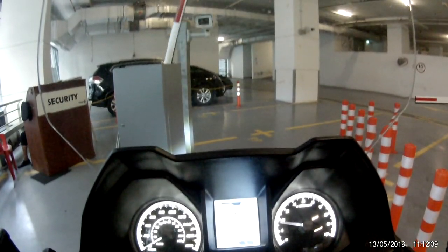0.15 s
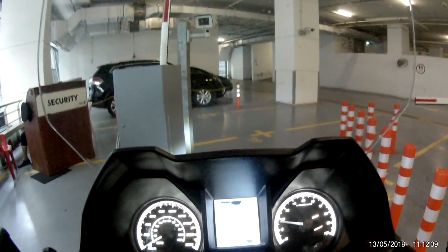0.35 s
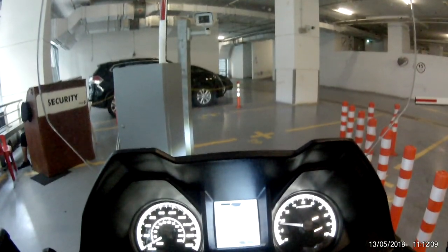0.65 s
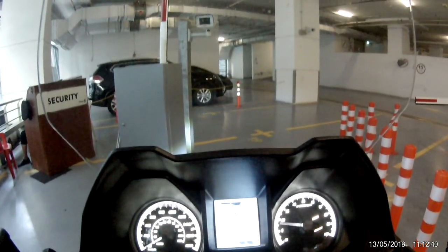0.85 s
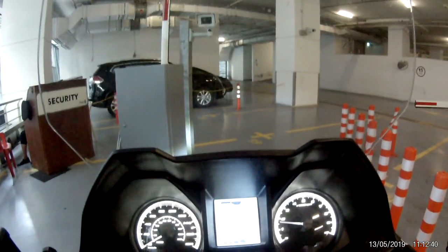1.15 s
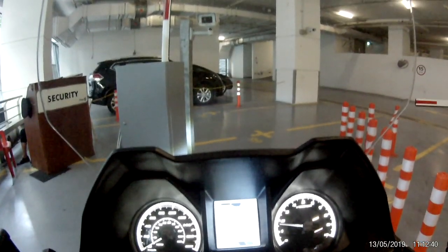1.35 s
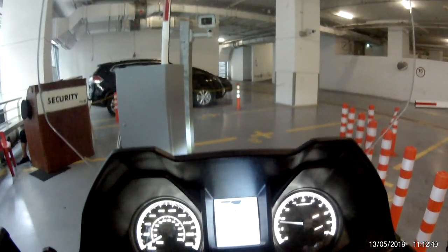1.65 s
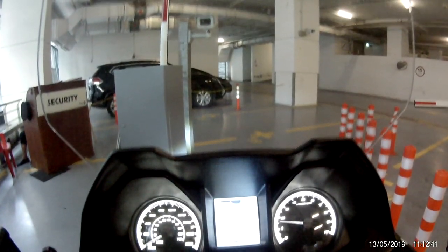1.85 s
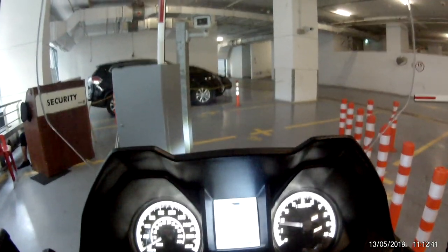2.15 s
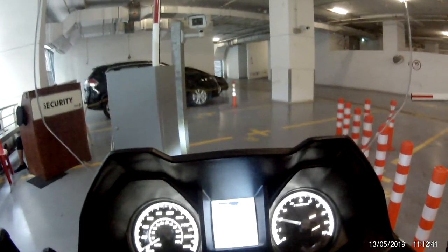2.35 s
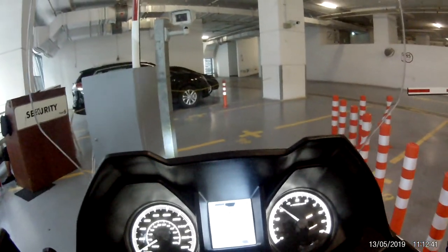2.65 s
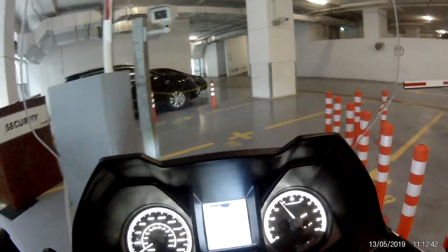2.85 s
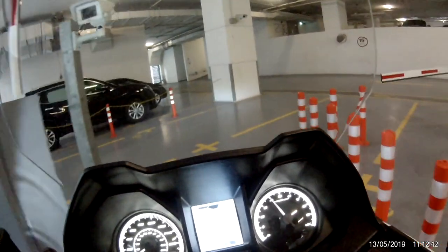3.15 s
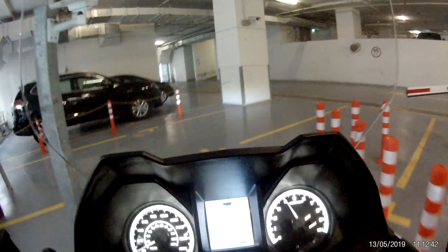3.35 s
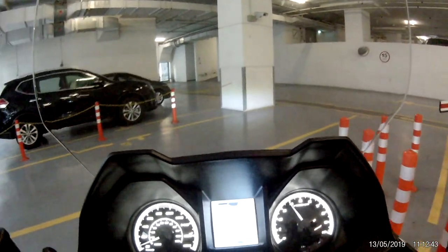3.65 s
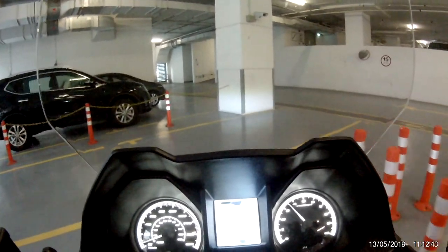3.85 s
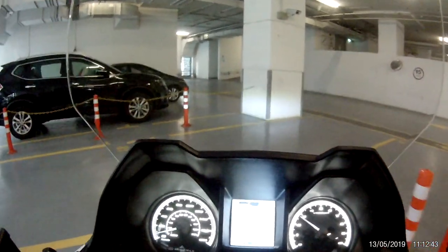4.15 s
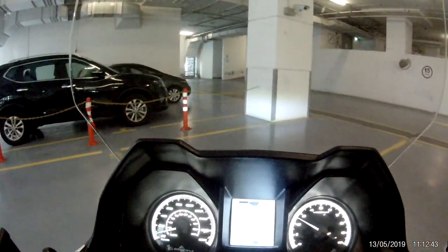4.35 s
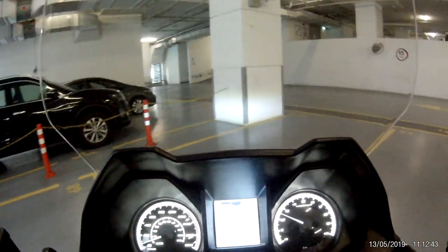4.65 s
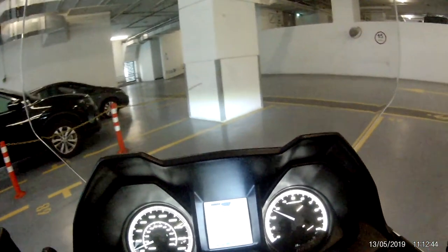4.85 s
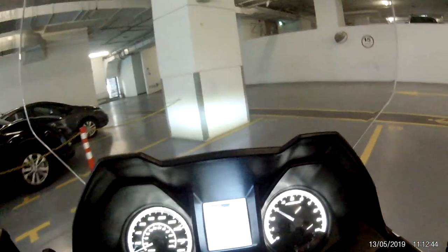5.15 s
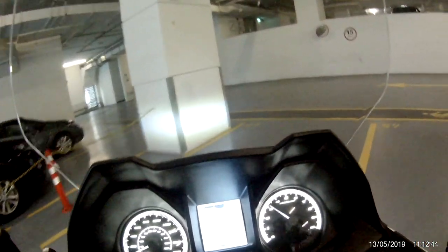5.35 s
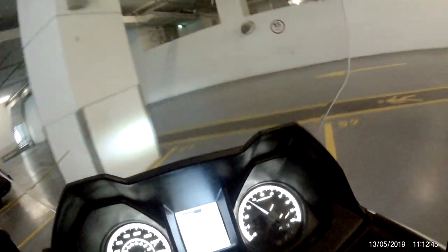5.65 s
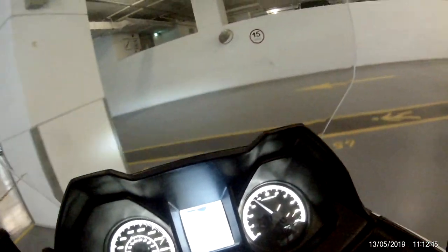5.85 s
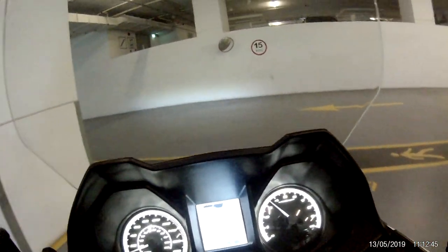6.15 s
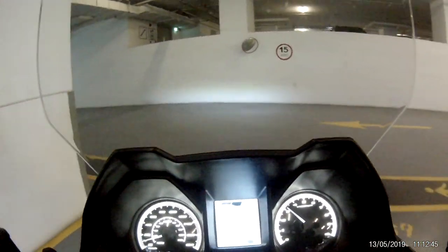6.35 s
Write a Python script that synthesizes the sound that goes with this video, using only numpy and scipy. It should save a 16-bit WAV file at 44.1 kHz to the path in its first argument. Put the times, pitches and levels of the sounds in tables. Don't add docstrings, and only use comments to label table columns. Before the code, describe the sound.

A motor scooter idles in a concrete car park, heard through a closed plastic case on the rider. A very deep, rapid shaking with dull padded knocks dominates. A loud buckle click snaps and bounces, the throttle opens and the engine strains, then eases into lower hum and rattles. A short pulsing tyre squeal marks the turn, followed by a second light pull of engine.

```python
import sys
import numpy as np
from scipy import signal
from scipy.fft import rfft, irfft, next_fast_len
from scipy.io import wavfile

SR = 44100
rng = np.random.default_rng(int(sys.argv[2]) if len(sys.argv) > 2 else 0)


def store_wav(level_fs):
    pcm = np.round(np.clip(np.atleast_2d(level_fs), -1, 1) * 32767)
    wavfile.write(sys.argv[1], SR, pcm.T.astype(np.int16))


def boost_factor(decibels):
    exponent = np.asarray(decibels, float) / 20
    return 10 ** exponent


N = 286650
TIME = np.arange(N) / SR
START_TURNS = .327


def unit(x):
    return x / np.sqrt(np.mean(x ** 2) + 1e-20)


def curves(rows):
    s, *cols = np.transpose(rows)
    return [np.interp(TIME, s, c) for c in cols]


def wobble(rate):
    knots = rng.standard_normal(int(N * rate / SR) + 4)
    return np.interp(TIME * rate, np.arange(len(knots)), knots)


def humps(s, width, db):
    return sum(d * np.exp(-((TIME - c) / w) ** 2) for c, w, d in np.broadcast(s, width, db))


def filtered(x, response):
    m = next_fast_len(N + SR // 8)
    return irfft(rfft(x, m) * response(np.fft.rfftfreq(m, 1 / SR)), m)[:N]


def through(x, modes):
    def response(f):
        total = 0
        for k, (centre, width, db) in enumerate(modes):
            damping = 1j * f * width
            total = total + (-1) ** k * boost_factor(db) * damping / (centre * centre - f * f + damping)
        return total
    return filtered(x, response)


def coloured(x, points):
    hz, db = np.transpose(points)
    return filtered(x, lambda f: boost_factor(np.interp(np.log(f + 1), np.log(hz), db, -90, -90)))


# time in seconds, rate in Hz.
SWING_RATE = [(0, 29.035), (.35, 28.544), (.8, 27.551), (1, 28.995), (1.35, 26.655), (1.7, 29.21),
              (1.85, 29.462), (2, 29.551), (2.15, 31.531), (2.3, 27.891), (2.45, 30.726), (2.7, 32.973),
              (3.25, 33.76), (3.55, 28.438), (5.15, 28.439), (5.4, 30.59), (5.9, 29.28), (6.5, 30)]
# time in seconds, level in dB.
SWING = [(0, -23), (1.3, -24.5), (1.65, -21.5), (1.8, -18), (2.08, -17), (2.4, -21), (2.6, -30.5),
         (3.25, -29.5), (3.45, -22.5), (3.6, -28), (4.15, -29.5), (4.55, -38.5), (5.05, -38), (5.18, -26.5),
         (5.81, -20.5), (5.97, -41.5), (6.5, -40)]
# time in seconds, loss in dB.
CHECKS = [(2.155, 9), (2.53, 15), (3.04, 4), (3.63, 7.5), (3.8, 12), (4.04, 11), (4.21, 7), (4.75, 13),
          (5.3, 3.5)]
# time in seconds, share of random drift.
COASTING = [(3.55, 0), (3.7, 1), (5.0, 1), (5.12, 0.041), (5.93, 0.0037), (6.0, 1)]
# time in seconds, knock in dB.
STOP = [(0, 1.5), (.3, -2.5), (.8, -3.5), (1.2, -4), (1.5, 0.5), (3.4, -1.5), (5.3, -23.5), (5.57, -15),
        (5.65, 0.5)]


def mount():
    hz = curves(SWING_RATE)[0]
    check_s, loss_db = np.transpose(CHECKS)
    reach = np.sqrt(2) * boost_factor(curves(SWING)[0] - humps(check_s, .04, loss_db))
    turns = START_TURNS + np.cumsum(hz) / SR + 0.25 * curves(COASTING)[0] * wobble(9)
    angle = 2 * np.pi * turns

    idling = np.clip((2.1 - TIME) / 0.18, 0, 1)
    swing = np.cos(angle) + boost_factor(-19.5) * np.cos(2 * angle + 1.8) + boost_factor(-26) * np.cos(3 * angle)
    swing = reach * (swing + boost_factor(-23.5) * idling * np.cos(1.5 * angle))

    gap = .062
    place = reach * np.cos(2 * np.pi * (turns + .02)) + gap
    strikes = (place < 0) & (np.roll(place, 1) >= 0)
    speed = np.sqrt(np.abs(reach ** 2 - gap ** 2)) * boost_factor(curves(STOP)[0] + 2.2 * wobble(25))
    upper = np.diff(np.floor(turns + .275), prepend=0) * np.clip(reach / .14 - 1, 0, .15)

    t = np.arange(SR // 40) / SR
    knock = -np.sin(2 * np.pi * 250 * t - 1.3) * (t / 0.0017) ** 2 * np.exp(2 - t / 0.0008)
    push = np.sin(2 * np.pi * 420 * t) * (t / 0.00078) * np.exp(1 - t / 0.00056)
    blows = signal.fftconvolve(strikes * speed, knock) + boost_factor(-1) * signal.fftconvolve(upper, push)
    tick = through(upper * boost_factor(3.5 * wobble(25)), [(2020, 200, 6.5), (3290, 680, -8)])
    return swing + blows[:N] + boost_factor(4.5) * tick, hz


# time in seconds, rate in Hz.
REV = [
    (2.2, 30.21),
    (2.4, 34.01),
    (2.5, 34.65),
    (2.75, 33.76),
]


def firing_turns(mount_hz):
    revving = (TIME > REV[0][0]) & (TIME < REV[-1][0])
    return START_TURNS + np.cumsum(np.where(revving, curves(REV)[0], mount_hz)) / SR


# multiple of the firing rate, level in dB.
FIRING = [(1, 0), (2, -9.5), (3, -26.5), (4, -13.5), (5, -11), (6, -26), (7, -10.5), (8, -13.5), (9, -15),
          (10, -20.5), (11, -22.5), (12, -16), (13, -13.5), (14, -17.5), (15, -13.5), (16, -16), (17, -28),
          (18, -30), (19, -32.5), (20, -33)]
# opening in seconds, shutting in seconds, load in dB.
THROTTLE = [
    (2.33, 3.294, -32.5),
    (5.22, 5.856, -40),
]
# centre in Hz, width in Hz, level in dB.
CAVITY = [(461.5, 55.3, 5.5), (663, 58.3, 2.5), (903.5, 53, -4), (1058.6, 63, 0), (1274, 97, 0),
          (1453, 232, -9)]


def exhaust(turns):
    orders = np.zeros(N)
    for k, db in FIRING[1:]:
        level = boost_factor(db + (k < 8) * humps(3.16, 0.23, [-5]))
        orders += level * (1 + 0.11 * wobble(6)) * np.sin(2 * np.pi * (k * turns + rng.random()))
    fired = np.diff(np.floor(turns + .05), prepend=0) * boost_factor(.8 * wobble(30))
    raps = boost_factor(-17) * unit(through(through(fired, [(1160, 500, 0)]), CAVITY[3:]))

    opens_db_per_s, shuts_db_per_s, shut_db = 150, 121, -50.5
    loads = []
    for opened, shut, db in THROTTLE:
        slope = np.minimum(opens_db_per_s * (TIME - opened), shuts_db_per_s * (shut - TIME))
        loads.append(db + np.minimum(0, slope))
    load_db = np.max(loads, axis=0)
    load_db = np.where(TIME > THROTTLE[0][1], np.maximum(load_db, shut_db), load_db)
    return np.sqrt(2) * boost_factor(load_db) * (orders + raps)


# time in seconds, speed in Hz, hum in dB.
ENGINE = [(3.3, 68.8, -59), (3.59, 46, -46), (3.91, 36.82, -35), (4.11, 38.27, -31), (4.18, 41.45, -50),
          (4.6, 47.6, -36.5), (5.0, 51, -50.5), (5.3, 63.26, -56), (5.81, 61.33, -43), (6.12, 44.3, -40.5),
          (6.39, 38, -32), (6.5, 38, -28.5)]


def crank_hum():
    hz, hum_db = curves(ENGINE)
    crank = 2 * np.pi * np.cumsum(hz) / SR
    hum = np.clip((TIME - 3.3) / .1, 0, 1) * boost_factor(hum_db) * np.sin(crank)
    creeping = np.interp(TIME, [4.35, 4.55, 4.8, 4.95], [0, 1, 1, 0])
    half_orders = sum((1 + 0.51 * wobble(13)) * np.sin(crank * order / 2) for order in range(7, 11))
    return np.sqrt(2) * (hum + creeping * boost_factor(-48.5) * half_orders)


# centre in Hz, width in Hz, level in dB.
FRAME = [(94, 46.3, -10), (178.5, 39, 0), (226, 40.6, -2), (302.6, 48.3, -7.5)]
SHELL = [(1860, 210, 4), (2300, 183, 0.5)]
LID = [(3370, 190, 0.5), (4200, 260, -12.5)]
BACK = [(190, 90, -8), (380, 120, -5), (520, 70, 0), (700, 110, -5)]
# shell, cavity, thud, frame and edge level, in dB over the lid.
TICK = (-3, 6.5, -4, -12, 6)
SCRAPE = (11.8, 12, 9.8, 10, 15)
CREAK = (5.7, 20.9, 8, 21.6, 17.6)
THUD = (5, 10, 27, 39, 0)
CATCH = (-14, -16, -24, -30, -3.5)
SNAP = (-10, 2, 11.5, -9, -14)
# start in seconds, lid level in dB, length in seconds.
TICKS = [(4.2506, -35, .013), (5.152, -49, .013), (5.2926, -38.5, 0.017), (4.151, -43, .012),
         (2.169, -53.5, .0045), (5.9614, -50, .0079)]
SCRAPES = [(2.2085, -42, .004), (2.2174, -40, .0046), (2.2443, -39.5, .007), (2.254, -45.5, .006),
           (2.326, -50, .005), (2.359, -47, .005), (5.3857, -52, .0074), (5.416, -55.5, 0.0092),
           (5.4466, -56, .012), (0.519, -48.5, .0065)]
CREAKS = [(.467, -54, .0059), (.506, -49, .015), (1.6666, -63, .01), (4.836, -56, .01)]
THUDS = [(.524, -58.5, 0.011), (3.42, -67, .01), (3.842, -64, .013), (3.9153, -59, .0066),
         (4.113, -53, .012), (4.132, -61, 0.034), (5.0723, -55.5, 0.0097), (5.544, -60, .007),
         (5.631, -66.5, .01)]
CATCHES = [
    (1.6942, -23.5, .007),
    (3.8824, -40.5, 0.0133),
]
SNAPS = [
    (1.7157, -13.5, 0.0059),
    (1.7227, -14, .0042),
    (1.7304, -22, 0.0072),
]


def clicks():
    scratch = np.zeros((6, N + SR))
    t = np.arange(SR // 10) / SR
    kinds = [(TICK, TICKS), (SCRAPE, SCRAPES), (CREAK, CREAKS), (THUD, THUDS), (CATCH, CATCHES), (SNAP, SNAPS)]
    for kind, contacts in kinds:
        for s, db, length in contacts:
            envelope = np.exp(-t / (.4 * length)) * (1 - np.exp(-t / 0.0005))
            burst = rng.standard_normal((6, len(t))) * envelope
            start = round(s * SR)
            scratch[:, start:start + len(t)] += boost_factor(db + np.array([0, *kind])[:, None]) * burst
    lid, shell, cavity, thud, frame, edge = scratch[:, :N]

    ring = boost_factor(16) * through(through(lid, LID), [(3430, 1900, 0)])
    ring += boost_factor(14) * through(shell, SHELL)
    ring += boost_factor(20) * through(cavity, CAVITY[2:])
    body = through(thud, BACK) + through(frame, FRAME[1:])
    ring += boost_factor(24.5) * filtered(body, lambda f: 1 / (1 + 1j * f / 1100) ** 2)
    edge_points = [(4300, 0), (4800, 5), (5500, -9), (7000, 11), (7800, -2.5), (11000, -34.5)]
    return ring + boost_factor(-11.5) * coloured(edge, edge_points)


# first slip in seconds, last in seconds, pitch in Hz, level in dB, share of the beat sounding.
SQUEALS = [
    (4.949, 5.09, 1867, -34, 1.156),
    (5.385, 5.46, 1824, -50, 0.66),
]
# start in seconds, length in seconds, pitch in Hz, level in dB.
SQUEAKS = [(4.908, .035, 1860, -45.5), (4.91, 0.057, 2360, -45), (2.56, .028, 1870, -50),
           (5.11, .055, 2510, -61.5), (3.966, .028, 3360, -56), (4.003, .05, 3460, -59),
           (4.058, .045, 3400, -60), (4.123, .026, 3330, -51), (4.136, .049, 3400, -47),
           (4.14, 0.029, 4325, -53), (4.0, 0.071, 4280, -61), (2.72, .23, 4200, -68), (4.2, .03, 4800, -71),
           (4.7, .03, 4790, -67)]


def squeal():
    period = 0.03364
    bursts = [(*squeak, -29) for squeak in SQUEAKS]
    for first, last, hz, db, fill in SQUEALS:
        slips = np.arange(first, last, period)
        for s in slips[:-1]:
            bursts.append((s, fill * period, hz, db, -16))
        bursts.append((slips[-1], fill * period * .75, hz * (1 - .014), db - 6, -16 - 12))

    out = np.zeros(N)
    flutter, drift = boost_factor(2.1 * wobble(120)), 0.75 * wobble(100)
    grit = .4 + wobble(320)
    for s, length, hz, db, octave_db in bursts:
        part = slice(round(s * SR), round((s + length) * SR))
        progress = np.clip((TIME[part] - s) / length, 0, 1)
        phase = 2 * np.pi * hz * TIME[part] + drift[part]
        tone = np.sin(phase) + boost_factor(octave_db) * np.sin(2 * phase)
        roughness = grit[part] if hz > 3000 else 1
        out[part] += roughness * boost_factor(db + 4.5) * np.sin(np.pi * progress ** 0.71) * tone
    return out * flutter


# time in seconds, level in dB over idle.
EFFORT = [(0, 0), (1.66, 1), (2.0, 4.5), (2.3, 15.5), (2.88, 11.5), (3.3, 14), (3.5, 7.5), (3.62, 9.5),
          (3.85, 5), (4.0, 10), (4.17, 11), (4.3, 6.5), (4.72, 5.5), (4.83, 10), (5.3, 10), (6.05, 6.5),
          (6.3, 7), (6.5, 1.5)]
# time in seconds, rise in dB.
BUMPS = [(0, 7.5), (.55, 7), (1.85, 6), (2.2, 14.5), (2.36, 10), (3.42, 10), (3.85, 5), (4.15, 4),
         (4.3, 4.5), (4.84, 6.5), (5.14, 8), (5.3, 5), (5.5, 8), (5.7, 6.5), (5.92, 6.5)]
# time in seconds, length in seconds, shell rise in dB, lid rise in dB.
SHIFTS = [(1.75, .06, 7, 4), (2.297, 0.063, 5.5, 7), (2.418, 0.15, 9, 10.5), (3.97, .08, -1, 9),
          (4.082, .1, 9, 8), (4.22, .1, 7, 11), (5.0, 0.19, 10, 10), (5.4, 0.11, 1.5, 6)]


def case_noise(turns):
    effort = curves(EFFORT)[0]
    bump_s, bump_db = np.transpose(BUMPS)
    shift_s, length, shell_db, lid_db = np.transpose(SHIFTS)
    frame_db = -44.5 - 0.09 * effort + humps(bump_s, 0.087, bump_db)
    roar_db = -57 + effort
    whine_db = -70 + 0.32 * effort + humps(shift_s, length, shell_db)
    rub_db = -77.5 + 0.47 * effort + humps(shift_s, length, lid_db)

    beat = np.cos(2 * np.pi * (turns + 0.3))
    loaded = np.interp(TIME, [2.2, 2.27, 2.7, 2.8], [0, 1, 1, 0])
    bite = loaded * np.cos(2 * np.pi * (turns + 0.76))
    roar_db = roar_db + 3 + 0.71 * beat
    whine_db = whine_db - 0.5 + 4.5 * (1 - loaded) * beat + 10 * bite
    rub_db = rub_db - 0.5 + 0.7 * beat + 7 * bite

    def ringing(depth_db, rate, modes):
        return unit(through(boost_factor(depth_db * wobble(rate)) * rng.standard_normal(N), modes))

    frame = boost_factor(frame_db + 0.5) * ringing(1.4, 32, FRAME)
    roar = boost_factor(roar_db) * ringing(2.15, 35, CAVITY + [(1866, 117, -12.5)])
    whine = boost_factor(whine_db) * ringing(1.8, 35, [(2020, 250, -5), (2330, 110, -1.5), (1860, 80, -6.5)])
    rub = boost_factor(rub_db) * ringing(2.5, 49, [(3332, 110, 2.0), (3530, 110, 2.5), (4330, 230, -10.0)])
    return frame + roar + whine + rub


def surroundings():
    fans = boost_factor(-72) * unit(through(rng.standard_normal(N), [(4175, 200, 4), (2600, 40, -2)]))
    road_points = [(12, -11), (30, -2), (60, -6.5), (120, -8.5), (160, -14)]
    road = boost_factor(-51) * unit(coloured(rng.standard_normal(N), road_points))
    return fans + road


def scene():
    shake, mount_hz = mount()
    turns = firing_turns(mount_hz)
    motor = exhaust(turns) + crank_hum()
    return (shake + motor + clicks() + squeal() + case_noise(turns) + surroundings())[None]


def roll_off(x):
    return signal.sosfilt(signal.butter(12, 16040, fs=SR, output="sos"), x)


# frequency in Hz, level in dB.
HISS = [(500, -8.5), (3000, -6.5), (6900, 1), (7400, -4.5), (12000, -5.5), (15900, -3)]


def record(dry):
    eased = dry[0] * np.clip(TIME / .01, 0, 1)
    dull = filtered(eased, lambda f: 1 / (1 + (f / 5000) ** 6) + boost_factor(-29.5))
    rounded = dull / (1 + np.abs(dull / .6) ** 4) ** (1 / 4)
    hiss = boost_factor(-78.5) * unit(coloured(rng.standard_normal(N), HISS))
    return roll_off((rounded + hiss)[None])


dry = scene()
out = record(dry)
store_wav(out)
```